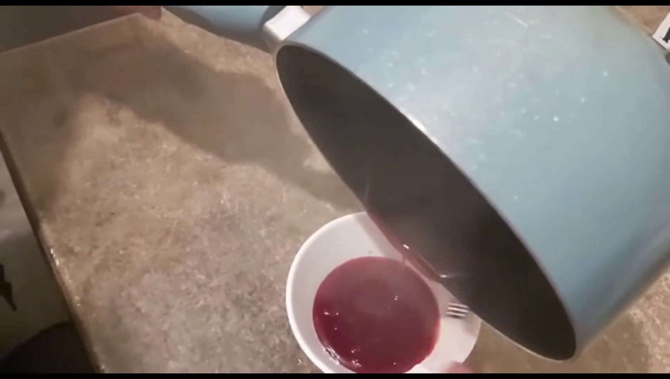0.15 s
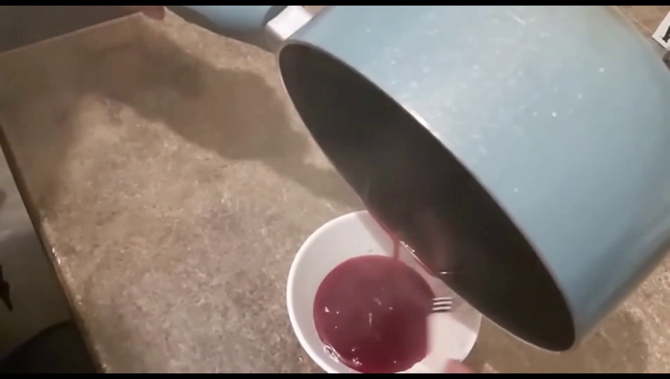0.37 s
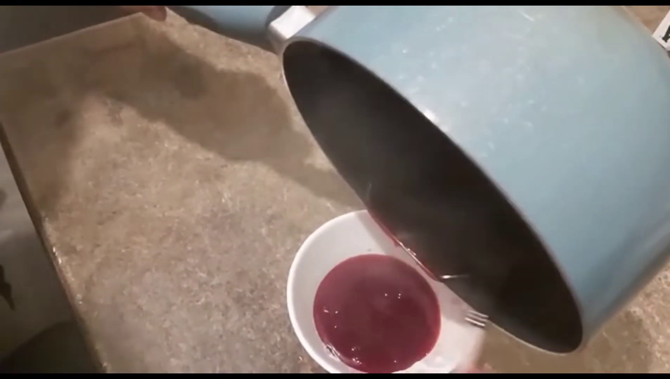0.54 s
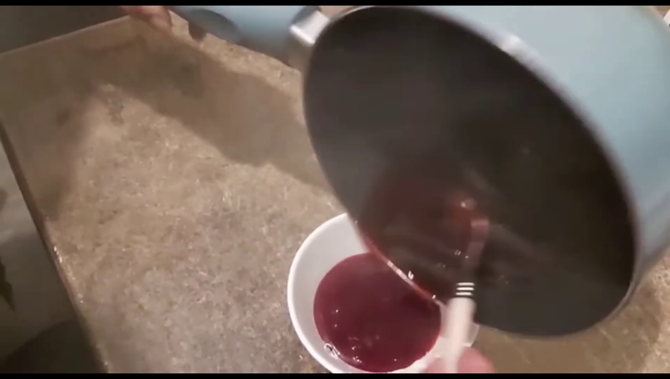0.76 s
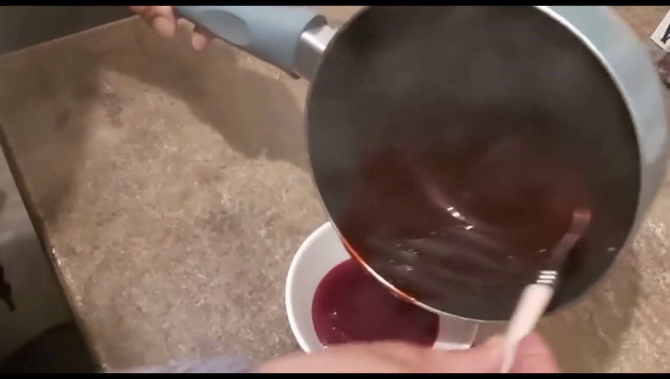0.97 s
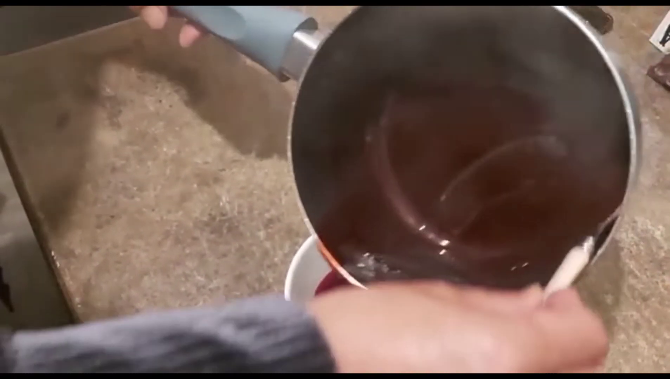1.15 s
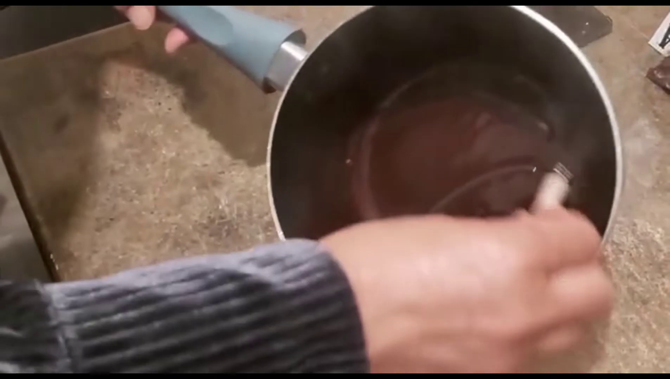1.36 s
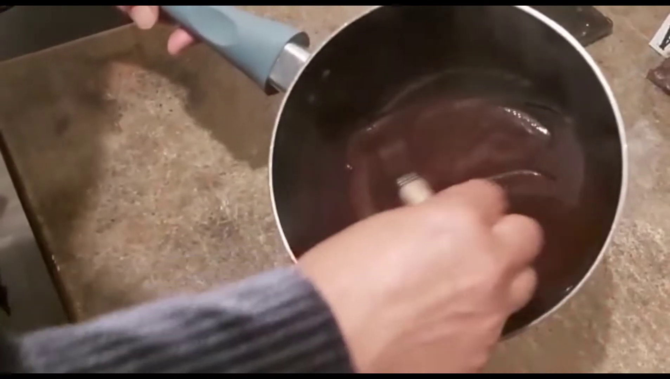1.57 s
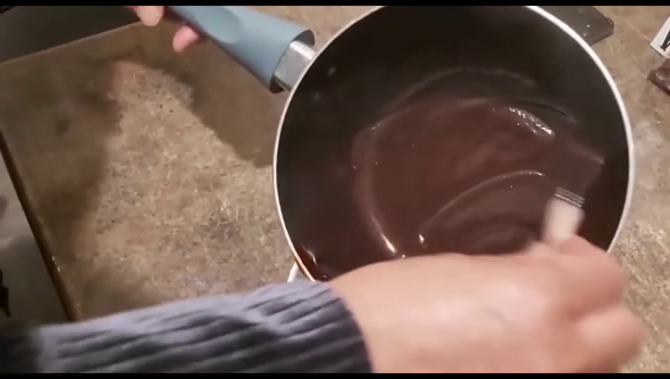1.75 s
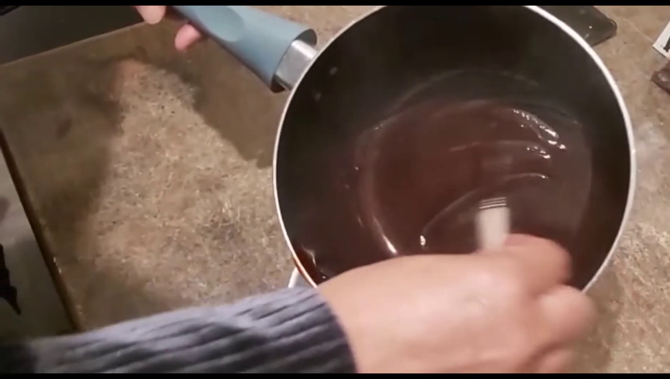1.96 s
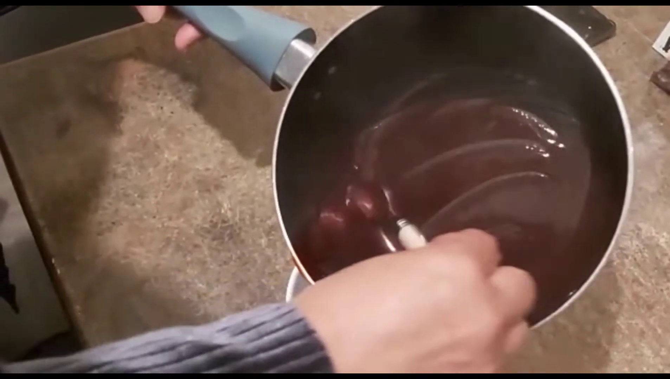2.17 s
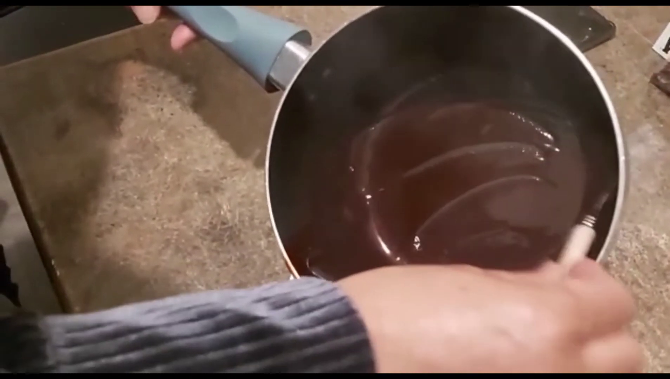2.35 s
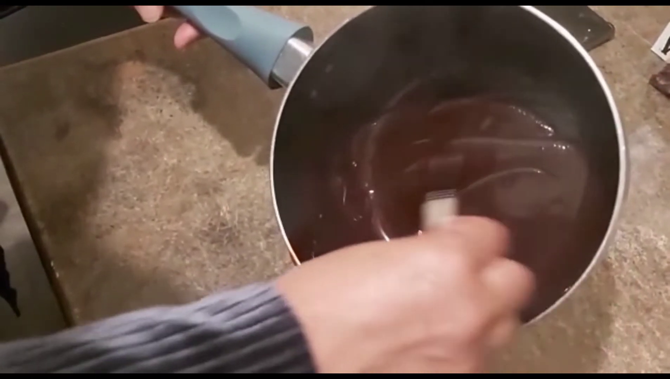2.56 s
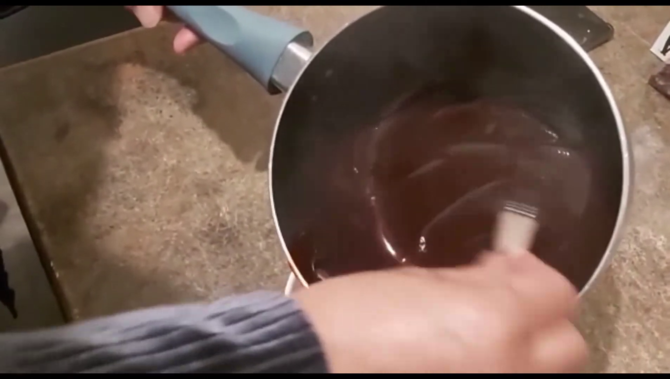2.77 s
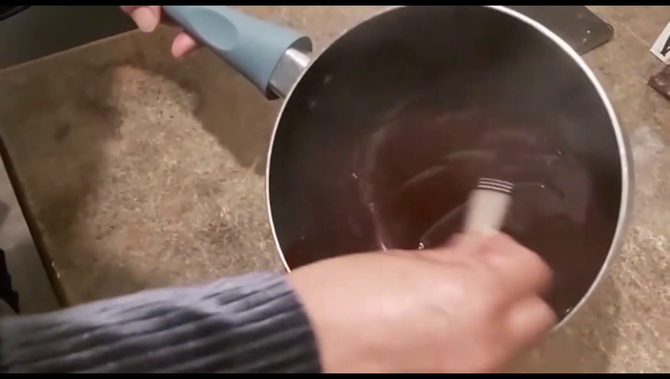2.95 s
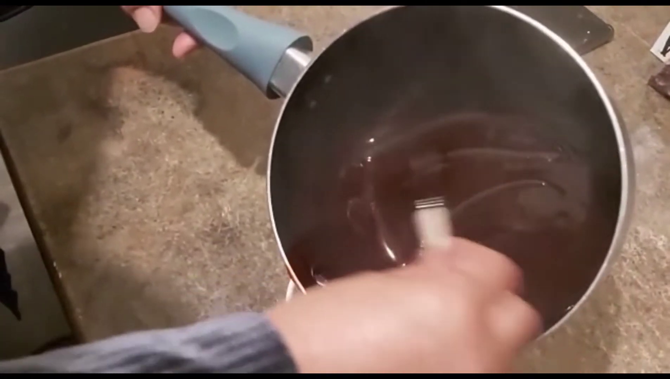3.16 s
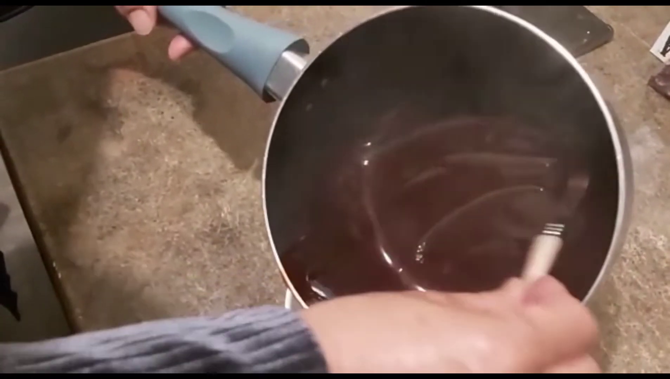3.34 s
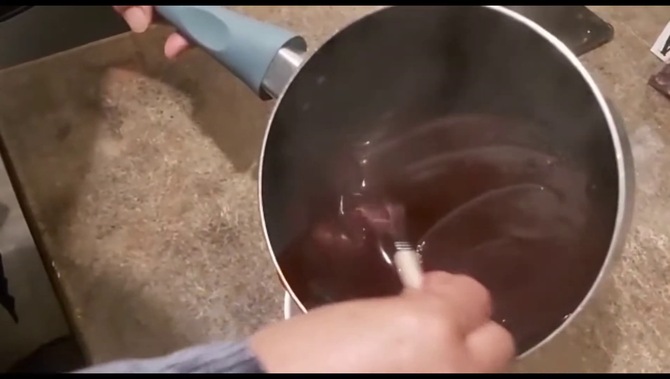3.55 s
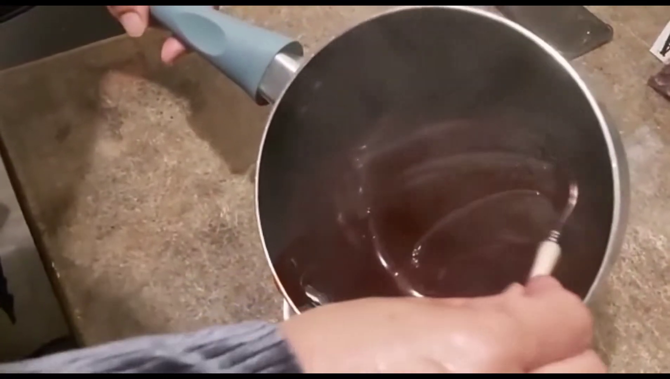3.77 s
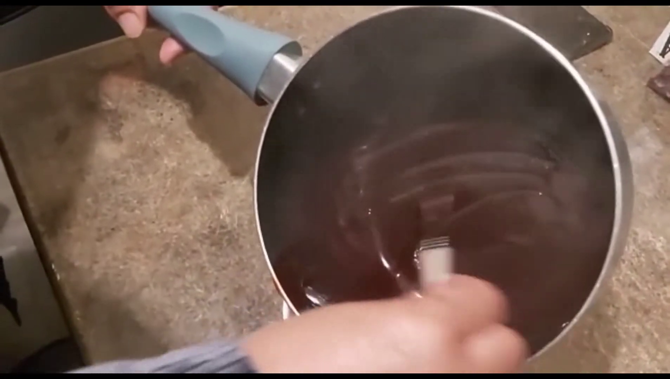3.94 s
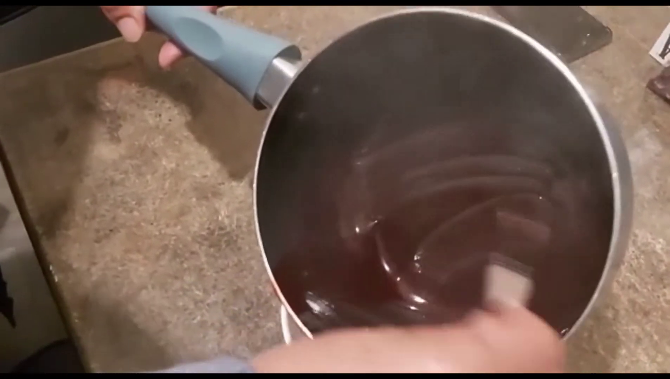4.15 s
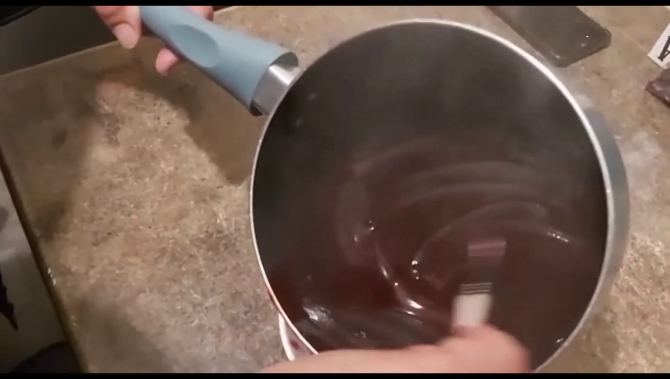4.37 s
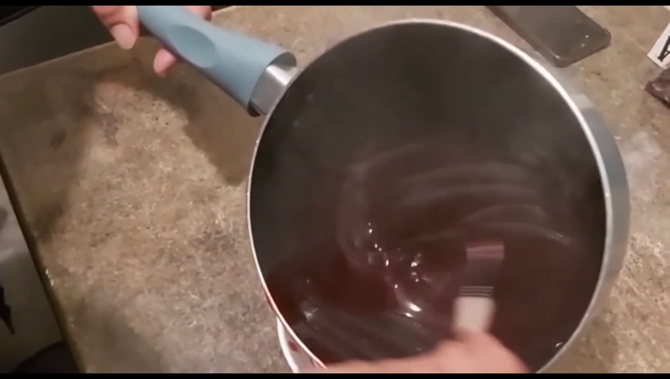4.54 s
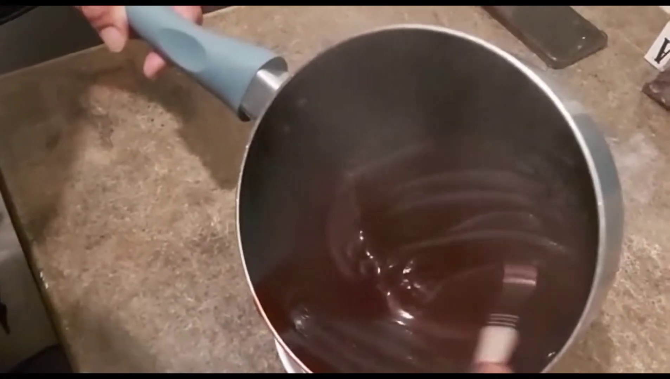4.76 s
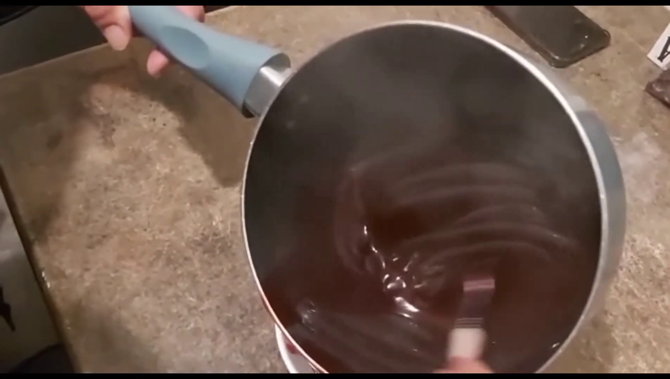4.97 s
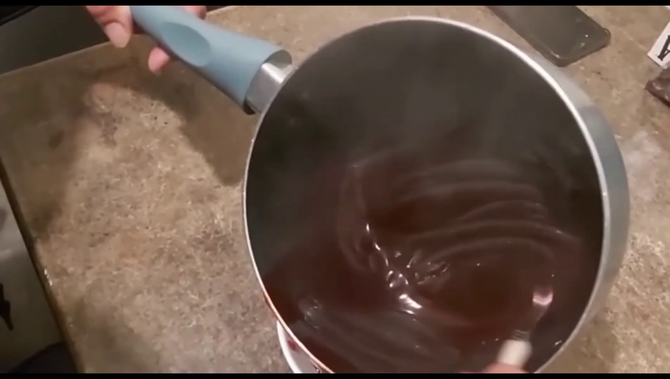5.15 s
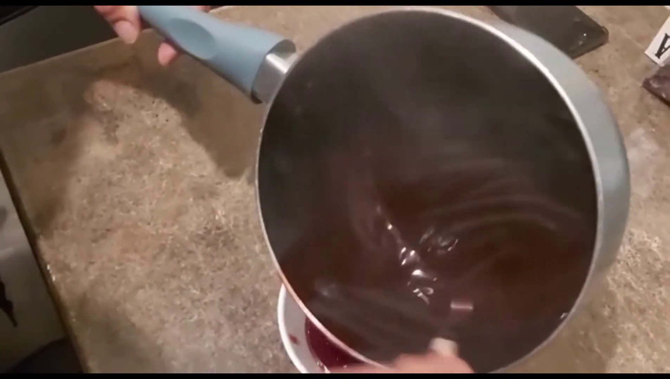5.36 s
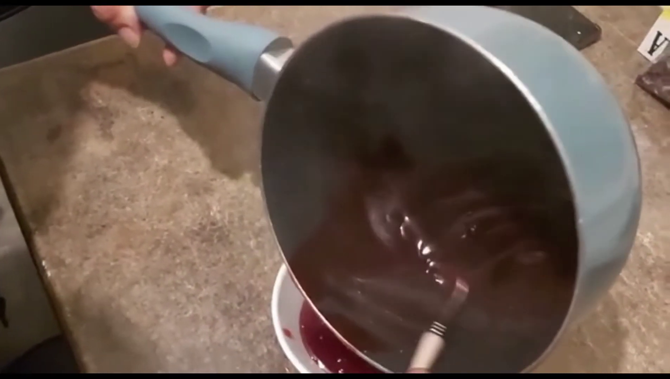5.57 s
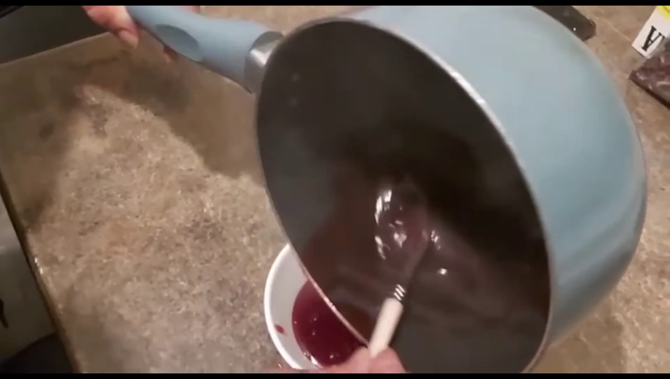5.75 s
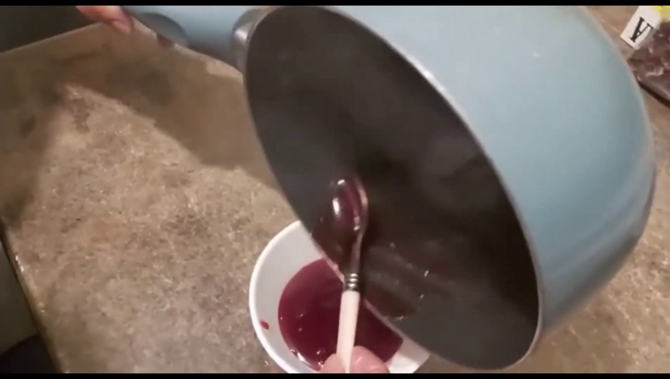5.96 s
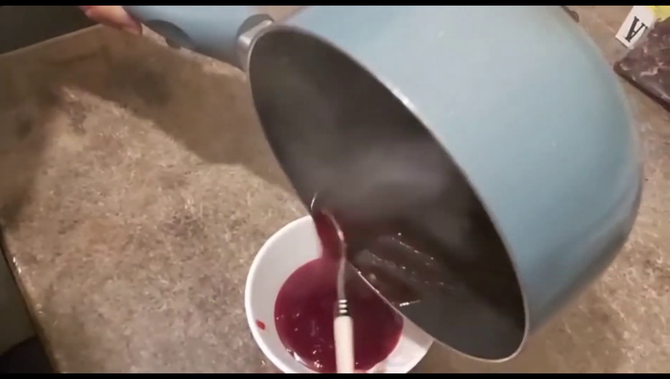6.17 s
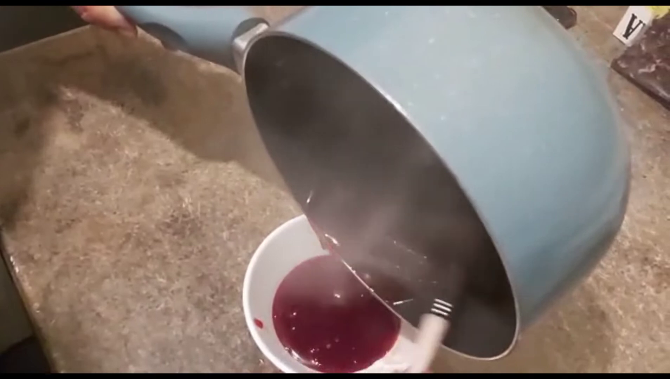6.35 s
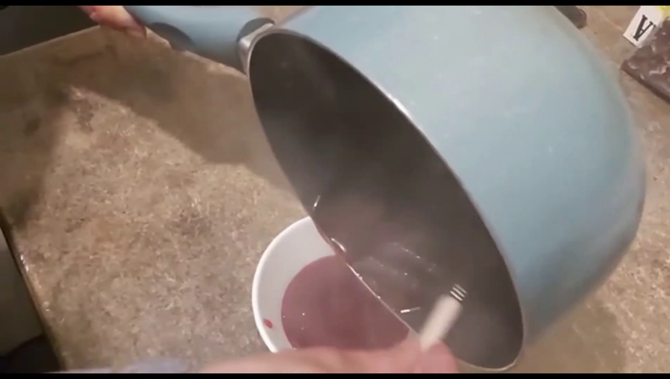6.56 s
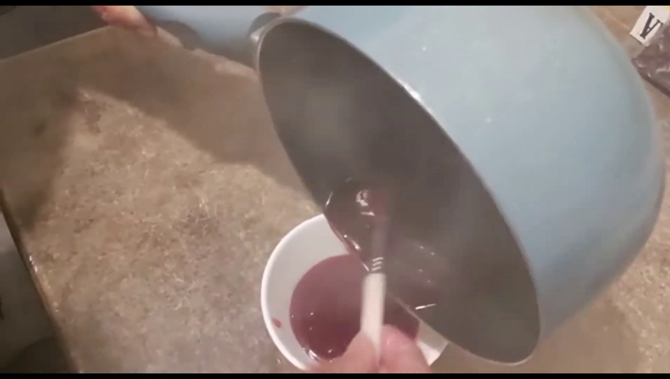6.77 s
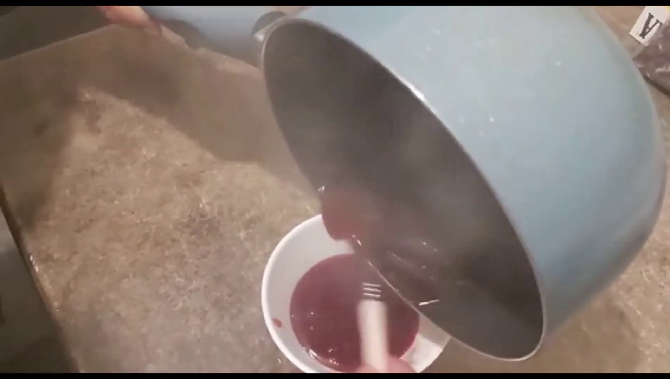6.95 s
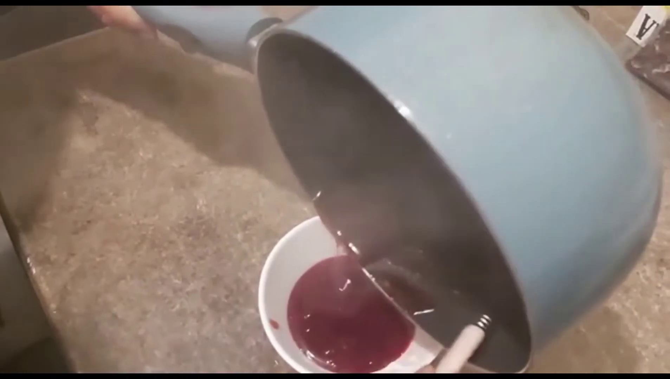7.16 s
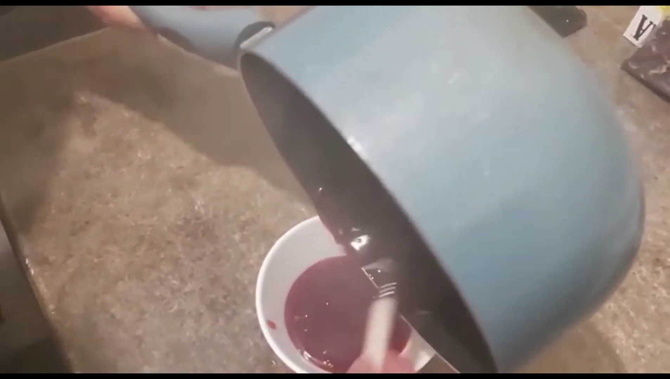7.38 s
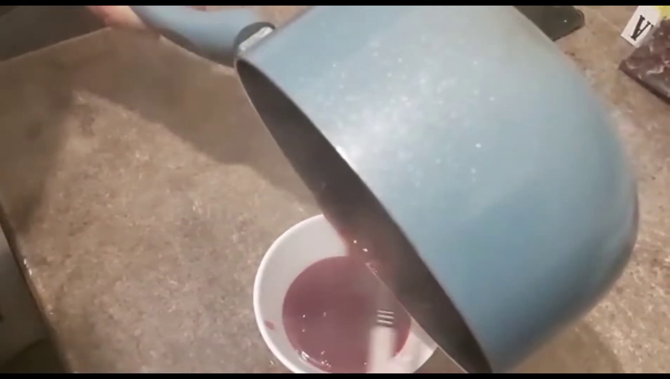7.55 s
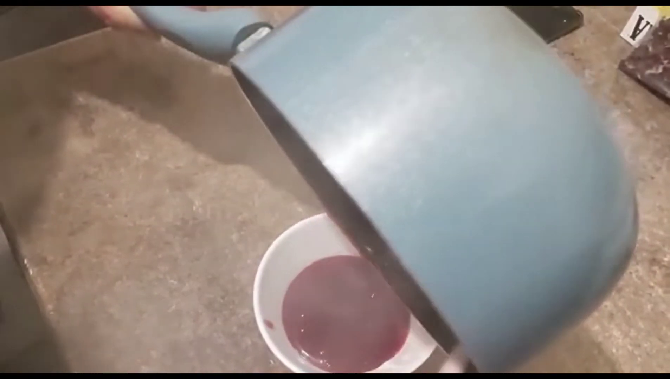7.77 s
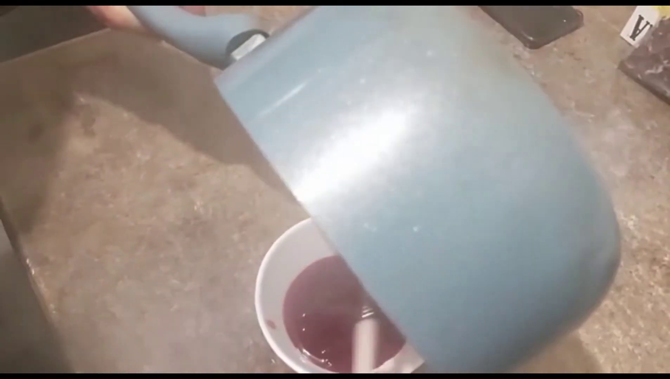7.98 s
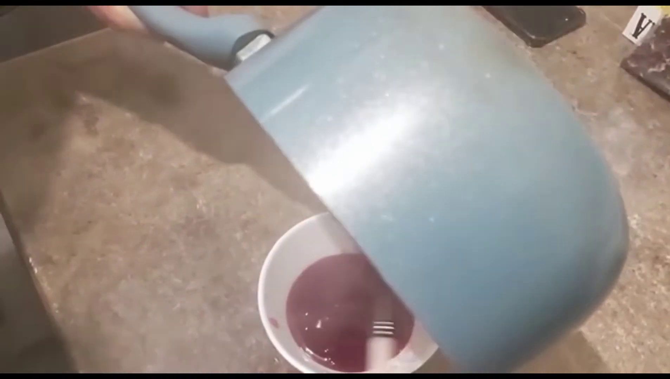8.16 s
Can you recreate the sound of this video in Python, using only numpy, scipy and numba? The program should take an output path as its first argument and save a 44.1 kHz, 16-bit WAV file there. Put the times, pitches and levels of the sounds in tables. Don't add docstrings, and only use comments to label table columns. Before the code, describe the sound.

A spoon taps and scrapes thick sauce inside a metal saucepan in gritty, lightly ringing strokes, close up over a faint kitchen hum.

```python
import sys
import numpy as np
from scipy import signal
from scipy.fft import rfft, irfft, next_fast_len
from scipy.io import wavfile
from scipy.ndimage import uniform_filter1d, map_coordinates
from numba import njit

SR = 44100
rng = np.random.default_rng(int(sys.argv[2]) if len(sys.argv) > 2 else 0)


def makeup_ratio(level_db):
    decades = np.asarray(level_db, float) / 20
    return 10 ** decades


def persist_wave(psi):
    counts = np.round(np.clip(psi, -1, 1) * 32767).astype(np.int16)
    wavfile.write(sys.argv[1], SR, np.atleast_2d(counts).T)


N = 362502
BLOCK = 64
TIME, SLOW = np.arange(N) / SR, np.arange(0, N, BLOCK) / SR

# (time [s], level [dB])
FRIDGE_HUM = [(0, -72), (.7, -66.5), (1.0, -75.5), (1.7, -68), (2.3, -73), (3.15, -62.5), (3.4, -74),
              (3.95, -72), (4.5, -64), (4.95, -78), (5.5, -70), (6.2, -72), (6.65, -63), (7.1, -74.5),
              (8.22, -65.5)]
FRIDGE_HZ = 87.2
# (frequency [Hz], density [dB per Hz])
ROOM_COLOUR = [(15, -45.5), (25, -26.5), (82, 3), (145, -3.5), (200, -2), (363, -2.5), (624, -18.5),
               (1840, -31.5), (2220, -25), (3250, -35), (5280, -30), (6740, -48.5), (7920, -35.5),
               (14800, -35.5), (16000, -36.5)]
ROOM_HISS_DB, RUMBLE_DB = -75, -68
HUM_LIFT_DB, RUMBLE_LIFT_DB, GATE_DB, GATE_S = 5.5, 6.5, -43.5, 0.073
# (time [s], frequency [Hz], peak [dB], t60 [s])
HAND_KNOCKS = [(0.532, 1305, -46, .06), (0.546, 453, -54, .12), (1.215, 840, -37.5, 0.037),
               (1.407, 800, -46, .05), (1.44, 640, -47, .08), (1.47, 655, -42.5, 0.12),
               (1.51, 720, -41, .08), (2.168, 717, -32, .06), (2.575, 688, -37, 0.09),
               (3.155, 740, -34.5, 0.07), (3.51, 756, -38, 0.077), (3.62, 702, -33, 0.073),
               (5.262, 656, -35.5, 0.097), (5.645, 920, -35.5, 0.16), (5.93, 796, -47, 0.069),
               (1.631, 398, -44, 0.033), (4.219, 320, -51.5, .08), (4.265, 430, -43, 0.14),
               (4.28, 640, -45, 0.093), (4.37, 640, -30, .08), (4.95, 632, -36.5, 0.069),
               (7.745, 454, -56, 0.2)]

# (time [s], base 0 to wall 1, lag of the right port [samples], detuning by the sauce [%])
SPOON_PLACE = [(0, 1, 2.73, 0.58), (1.4, 0.92, 2.2, 0.2), (1.47, 0.023, 1.2, -1.96),
               (3, 0.016, 1.77, -0.92), (4.13, 0.015, 2.8, -0.22), (4.17, .8, 1.4, -.2),
               (4.3, 0.68, 1.4, -0.72), (4.33, 0.018, 1.9, -0.017), (5.1, 0.027, 2.2, 0.064),
               (5.13, 1, 0.82, 0.2), (5.24, .9, 2, 0.014), (5.255, 0.031, 2, -0.25),
               (5.45, 0.056, 2.5, 0.59), (5.49, 0.66, 0.64, -0.48), (5.85, 0.65, 0.42, -0.9),
               (6.1, 0.85, 2.3, -1.02), (6.6, 0.94, 3.77, -0.87), (8.22, 1, 9.7, -0.39)]
# (start [s], hardest [s], lifted [s], hardest level [dB],
# starting level [dB])
BASE_STROKES = [(1.35, 1.43, 1.73, -47.5, -56), (1.42, 1.54, 1.607, -37, -54.5),
                (1.967, 2.07, 2.135, -34, -34), (2.151, 2.204, 2.23, -45.5, -40.5),
                (2.387, 2.41, 2.45, -45.5, -45), (2.46, 2.525, 2.613, -34, -52.5),
                (2.54, 2.6, 2.67, -36, -36), (2.924, 3.05, 3.135, -32.5, -43.5),
                (3.12, 3.145, 3.2, -33.5, -41.5), (3.445, 3.55, 3.61, -33, -33.5),
                (3.606, 3.68, 3.76, -50, -37.5), (3.921, 4.03, 4.11, -32.5, -34.5),
                (4.16, 4.23, 4.47, -38.5, -55), (4.335, 4.4, 4.6, -28.5, -43.5),
                (4.818, 4.9, 5.03, -31, -35.5), (4.95, 5.0, 5.1, -44, -44),
                (5.154, 5.18, 5.327, -42.5, -31), (5.262, 5.32, 5.46, -32, -34),
                (5.502, 5.55, 5.9, -49.5, -34.5)]
# (start [s], hardest [s], lifted [s], hardest level [dB], starting level [dB])
WALL_STROKES = [(0.107, 0.15, 0.24, -35.5, -33.5), (.16, .3, 0.42, -34.5, -36),
                (0.533, 0.48, 0.6, -57.5, -47), (0.584, 0.71, 0.81, -37.5, -35),
                (1.214, 1.26, 1.4, -49.5, -47), (5.6, 5.58, 5.76, -35, -41), (5.7, 5.78, 5.95, -44.5, -49),
                (5.8, 5.92, 6.2, -38.5, -48.5), (5.98, 6.12, 6.25, -41, -43), (6.536, 6.56, 6.7, -41, -36),
                (6.6, 6.65, 6.82, -42.5, -45.5), (6.72, 6.9, 7.053, -37.5, -45),
                (7.265, 7.37, 7.46, -47, -51.5), (7.36, 7.484, 7.63, -37, -54.5),
                (7.81, 7.835, 7.96, -40, -31), (7.87, 7.9, 8.2, -35, -49.5), (8.03, 8.08, 8.17, -36, -38)]
RISE_POWER, BASE_FALL_POWER, WALL_FALL_POWER = 1.32, 2.05, 1.74
LIFT_DB, FIRM_DB, LANDING_S = -30, -35, .03
# (time [s], peak [dB], weight of the blow [dB], edge sharpness
# [dB], left minus right [dB])
BASE_BLOWS = [(1.407, -44, -11.5, -20, 2), (1.536, -37, -37, -6.5, 1), (1.627, -59.5, -4.5, -20, 11),
              (1.963, -21.5, -36, -7.5, 7.5), (2.167, -36.5, -12, 8.5, 0), (2.389, -56, -5, 20.5, -11),
              (2.488, -40.5, -20, 0.5, 9), (2.927, -33.5, -27, 3, -5), (3.127, -39, -28, 19, 5),
              (3.444, -19.5, -47, -6.5, 8.5), (3.618, -23.5, -16, -0.5, -13.5), (3.923, -20, -45.5, 0, -12),
              (4.333, -30, -8, 3.5, -16), (4.55, -42, -1, -15, -10), (4.589, -47, -14, 0, -7),
              (4.817, -27.5, -17.5, 1, -7), (5.145, -30.5, -20.5, 5, -8.5), (5.26, -18.5, -14.5, 8.5, -6),
              (5.496, -32, -18.5, -13, -8)]
# (time [s], peak [dB], weight of the blow [dB], edge sharpness [dB], left minus right [dB])
WALL_BLOWS = [(0.003, -53.5, -30.5, -27, 2.5), (0.093, -62, -24, 3, -5), (0.111, -24.5, -14, 10.5, -9.5),
              (0.3, -28, -36, -12.5, 10.5), (0.535, -61.5, -5.5, -20, 11), (0.587, -24.5, -11, 9, -5),
              (1.216, -47.5, -15, -17.5, 6), (1.256, -38.5, -23.5, -5.5, 8), (5.608, -27.5, -3.5, 4, 3.5),
              (6.535, -40.5, -1.5, 25, -2.5), (7.265, -42, -16.5, 13, -9), (7.731, -64, 1, 13, 10),
              (7.81, -29.5, -12.5, 12, 9)]
TAP_RING_DB, TAP_HISS_DB, TAP_RING_SHARE = 5, -4.5, 0.46
BASE_CLICK_DB, WALL_CLICK_DB = 17.0, 14.0

# thud, body, ring, hiss [Hz]
BAND_HZ = [230, 650, 2400, 6500, 15400]
BASE_FIRM_DB = [-28, -3.5, 0.5, -16]
WALL_FIRM_DB = [-23, -1, -1.5, -12.5]
LIGHTNESS = [0.74, -0.15, -0.12, -0.17]
SHARPNESS = [0.47, -0.41, 0.89, 0.51]
# (time [s], hollow under it [Hz], edge sharpness [dB], pitch its bowl favours [Hz])
SPOON_HOLD = [(.12, 1307, 3, 2870), (.24, 1252, 0, 2690), (.31, 1900, -3, 3310), (.4, 2000, -2, 2650),
              (.54, 1293, -12.5, 2640), (.6, 1500, 1, 2990), (.72, 1500, 5, 3280), (.8, 2100, 1.5, 2700),
              (1.22, 837, -13, 2940), (1.26, 1600, -3.5, 4010), (1.38, 1500, -7, 4300),
              (1.459, 692, 6, 4700), (1.55, 1100, 7.5, 4600), (1.97, 1002, -9, 3180),
              (2.1, 1480, -0.5, 3010), (2.17, 920, -4, 4700), (2.5, 1500, -1.5, 3280),
              (2.62, 1200, -2, 2985), (2.94, 1387, 3, 2920), (3.05, 1100, 0.5, 3200),
              (3.15, 850, 0.5, 4898), (3.45, 950, -2.5, 4080), (3.55, 1400, 2, 3840),
              (3.62, 868, 0.5, 5150), (3.93, 955, 1.5, 3370), (4.07, 1494, 2, 3296),
              (4.25, 2070, 3.5, 4022), (4.36, 720, -2, 4400), (4.42, 1500, -1.5, 4300),
              (4.55, 1544, -1, 4200), (4.83, 1506, -1.5, 3790), (4.93, 1700, 1, 4330),
              (5.15, 1600, -1.5, 3600), (5.27, 1114, -0.5, 3120), (5.35, 1793, 0, 3190),
              (5.5, 1840, -7.5, 2760), (5.65, 970, -3, 4300), (5.83, 1460, -8, 2978),
              (5.97, 1360, -2, 4300), (6.12, 1650, -6, 4200), (6.55, 1100, 3.5, 4500),
              (6.78, 1000, 1, 4200), (6.87, 1750, -2, 3539), (6.95, 2300, -3, 3400), (7.28, 1580, 1, 3500),
              (7.46, 970, 1, 3470), (7.55, 1820, -3.5, 3440), (7.83, 2100, 2, 3490), (8.0, 1120, 2, 3540),
              (8.12, 1550, -1, 3200)]
HOLLOW_GLIDE_OCT = 0.14
# (time [s], level [dB])
HOLLOW_WHISTLE = [(.15, 0), (.28, 6), (.65, 3), (1.25, 2.5), (1.38, 7), (1.47, 9), (1.56, -2), (2.05, -4),
                  (2.57, -1.5), (3.05, -7), (3.16, 2), (3.53, -4.5), (4.0, -5), (4.25, 1), (4.37, 4),
                  (4.47, -6), (4.9, -2.5), (5.32, -5), (5.66, 0.5), (5.83, 8), (5.97, 10), (6.12, 4),
                  (6.6, 1), (6.8, 5), (6.93, 5), (7.3, -5), (7.48, 4), (7.86, -4.5), (8.05, 2)]
# (time [s], thud level [dB])
SAUCE_HEAP = [(.15, 8), (.3, -3.5), (.62, 15.5), (.78, -12.5), (1.3, -0.5), (1.9, -6.5), (2.08, -7),
              (2.2, 10.5), (2.55, -12), (3.08, -7), (3.5, -4), (3.68, 4), (4.0, -1.5), (4.27, 12), (4.9, 0),
              (5.6, 8.5), (5.9, 0.5), (8.0, -7)]
# (time [s], ringing level [dB])
EDGE_CONTACT = [(.15, 0.5), (.3, -0.5), (.62, 1.5), (.74, 1), (1.24, -3.5), (1.38, 0.5), (1.54, 1.5),
                (2.0, -0.5), (2.1, -4.5), (2.18, 2.5), (2.41, 0.5), (2.56, 0), (2.97, 2), (3.06, 1),
                (3.15, -1.5), (3.47, -2.5), (3.56, -2), (3.64, -3.5), (3.95, -1.5), (4.05, -1.5),
                (4.25, -6), (4.43, 4.5), (4.55, 2), (4.85, 1.5), (4.93, -1), (5.18, -2), (5.3, 2),
                (5.52, -2.5), (5.65, 1), (5.85, -2), (6.05, 2.5), (6.58, -5), (6.78, -2), (6.92, 2),
                (7.3, 4), (7.5, 1.5), (7.85, -2), (8.05, 1.5)]

# (frequency [Hz], width under the spoon [Hz], level [dB])
BASE_MODES = [(931, 46, -2), (1450, 38, -19), (1890, 44, 0), (2940, 38, -2), (3520, 55, -6), (4360, 90, -8),
              (4880, 63, -6), (5940, 80, -9), (6280, 36, -11), (7170, 160, -22), (7670, 140, -18),
              (8950, 53, -25), (9180, 95, -26), (9840, 58, -28), (11700, 210, -31)]
# (frequency [Hz], width under the spoon [Hz], level [dB])
WALL_MODES = [(926, 34, -6), (1500, 55, -4), (1860, 26, -6), (2160, 36, 0), (2610, 32, -3), (3100, 38, -4),
              (3500, 36, -3), (3960, 60, -10), (4450, 140, -13), (5120, 100, -11), (5510, 120, -10),
              (6000, 88, -16), (6700, 28, -14), (6970, 120, -13), (7130, 53, -15), (8380, 82, -19),
              (9260, 47, -18), (9940, 66, -19), (10400, 53, -20), (11500, 88, -21)]
BASE_DETUNING = [1.1, 1.1, 1.9, .35, 0.11, .8, 0.46, 1.5, .9]
WALL_EMPTY_GAIN = [5, -2, 5, 2.3, -6, -4.5, -2, -7.5, -0.5, -4]
EMPTY_S = 3.0
# (time [s], level [dB])
NODE_CROSSING = [(1.54, 3), (2.05, -3), (2.2, -1), (2.57, 4), (3.03, 5), (3.14, -5), (3.5, -2), (3.62, -5),
                 (4.0, -3), (4.45, -6), (4.9, 1), (5.3, -2)]
CROSSING_SHARE = [0.01, 0.01, 0.01, 0.01, 0.1, 1.01, -1.01, 0.3]
# (frequency [Hz], width [Hz], level [dB])
HOOP_MODES = [(949, 16, -13), (1803, 9.2, -11)]
# (frequency [Hz], width [Hz], from the base [dB], from the wall [dB])
SHELL_MODES = [(247, 20, -16, -1), (384, 150, -8.5, 2.5), (657, 170, 12, -8)]
# (frequency [Hz], density [dB per Hz])
RASP_COLOUR = [(120, -57), (200, -20.5), (720, -19.5), (933, -0.5), (1100, -15.5), (1840, -5.5),
               (2420, -12), (3560, -7), (12200, -34), (14600, -42), (16000, -65.5)]
TREBLE_HZ = [6500, 8200, 10000, 11700, 13300, 15300]
# (frequency [Hz], left gains and right loses [dB])
MIC_TILT = [(300, -1), (800, -0.5), (2500, -0.1), (5000, -2.5), (9000, 2), (15000, 0.5)]


def track(table, times):
    return np.interp(times, *np.transpose(table)[:2])


def per_sample(control):
    return np.interp(TIME, SLOW, control)


def butter(x, order, hz, kind="low"):
    return signal.sosfilt(signal.butter(order, hz, kind, fs=SR, output="sos"), x)


def below(x, order, hz):
    return signal.sosfiltfilt(signal.butter(order, hz, fs=SR, output="sos"), x)


def band(x, lo_hz, hi_hz):
    return butter(x, 4, [lo_hz, hi_hz], "band") * np.sqrt(SR / 2 / (hi_hz - lo_hz))


def colour(x, spectrum):
    size = 2 * next_fast_len(N // 2 + 4096)
    hz, db = np.transpose(spectrum)
    f = np.arange(size // 2 + 1) * SR / size + 1
    cepstrum = irfft(np.log(makeup_ratio(np.interp(np.log(f), np.log(hz), db))), size)
    cepstrum[1:size // 2] *= 2
    cepstrum[size // 2 + 1:] = 0
    return irfft(rfft(x, size) * np.exp(rfft(cepstrum)), size)[..., :N]


def walk(rate):
    hold = max(int(SR / BLOCK / rate), 1)
    steps = np.repeat(rng.standard_normal(len(SLOW) // hold + 1), hold)
    return 1.87 * uniform_filter1d(uniform_filter1d(steps, hold), hold)[:len(SLOW)]


def tail(t60, likeness, size):
    common, own = rng.standard_normal(size), rng.standard_normal((2, size))
    likeness = np.clip(likeness, 0, 1)
    noise = np.sqrt(likeness) * common + np.sqrt(1 - likeness) * own
    h = noise * makeup_ratio(-60 * TIME[:size] / t60)
    return h / np.sqrt(np.mean(np.sum(h ** 2, axis=1)))


def kitchen():
    gate_blocks = GATE_S * SR / BLOCK
    busy = uniform_filter1d(makeup_ratio(pushes()[0]), int(gate_blocks))
    busy = uniform_filter1d(busy, int(gate_blocks / 2))
    gate = per_sample(np.tanh(busy / makeup_ratio(GATE_DB)))
    hz = FRIDGE_HZ + 1.5 * per_sample(walk(5))
    hum = np.sqrt(2) * np.sin(2 * np.pi * np.cumsum(hz) / SR)
    hum *= makeup_ratio(track(FRIDGE_HUM, TIME) + HUM_LIFT_DB * gate)
    noise = rng.standard_normal((3, N))
    air = colour(1.3 * noise[0] + 0.84 * noise[1:], ROOM_COLOUR)
    rumble = below(air, 2, 450)
    hiss = air - rumble
    rumble *= makeup_ratio(RUMBLE_DB + RUMBLE_LIFT_DB * gate - 4.0) / rumble.std()
    lean = makeup_ratio(np.array([[-2.2], [2.2]]))
    return lean * (hum + rumble) + hiss * makeup_ratio(ROOM_HISS_DB) / hiss.std()


def knocks():
    out, t = np.zeros(N + SR), TIME[:SR // 2]
    for s, hz, db, t60 in HAND_KNOCKS:
        i = int(s * SR)
        swell = 1 - np.exp(-t / 0.0017)
        out[i:i + len(t)] += makeup_ratio(db - 60 * t / t60) * swell * np.sin(2 * np.pi * hz * t)
    return out[:N]


def pushes():
    level, course = np.full(len(SLOW), -120.), np.zeros(len(SLOW))
    taps_s = np.transpose(BASE_BLOWS + WALL_BLOWS)[0]
    for rows, fall in ((BASE_STROKES, BASE_FALL_POWER), (WALL_STROKES, WALL_FALL_POWER)):
        for start, hardest, lifted, db, entry_db in rows:
            tap = taps_s[np.argmin(abs(taps_s - start))]
            if abs(tap - start) < LANDING_S:
                start = tap + .003
            hardest = max(hardest, start + .002)
            u = (SLOW - hardest) / np.where(SLOW < hardest, hardest - start, lifted - hardest)
            swell = (entry_db - db) * abs(u) ** RISE_POWER
            ease = LIFT_DB * abs(u) ** fall
            push = db + np.where(u < 0, swell, ease)
            rules = (u >= -1) & (push > level)
            level, course = np.where(rules, push, level), np.where(rules, u, course)
    return level, np.clip(course, -1, 1)


def drag():
    pressure, course = pushes()
    s, hollow_hz, edge, bowl_hz = np.transpose(SPOON_HOLD)
    wall = np.clip(track(SPOON_PLACE, SLOW), 0, 1)
    light = np.clip(FIRM_DB - pressure, -10, 30)
    edge = np.interp(SLOW, s, edge)
    level = []
    for base, side, gain, reach in zip(BASE_FIRM_DB, WALL_FIRM_DB, LIGHTNESS, SHARPNESS):
        firm = base + wall * (side - base)
        level.append(per_sample(makeup_ratio(pressure + firm + gain * light + reach * edge)))
    level = np.array(level)
    level[0] *= makeup_ratio(track(SAUCE_HEAP, TIME))
    grit = rng.standard_normal(N) * makeup_ratio(2.1 * rng.exponential(size=N))
    shared = 0.4 * walk(50) + 0.9 * walk(300)
    patches = [per_sample(makeup_ratio(shared + 1.5 * walk(300) + 0.6 * walk(18))) for _ in level]
    force = grit * np.array(patches)
    friction = uniform_filter1d(level, 200) * force / force.std()
    glide = 2 ** (HOLLOW_GLIDE_OCT * uniform_filter1d(course, size=16))
    return friction, np.interp(SLOW, s, hollow_hz) * glide, np.interp(SLOW, s, bowl_hz)


def taps(contact_s=.0009, chatter_s=.004):
    out, t = np.zeros((4, 2, N + 1000)), TIME[:1000]
    shape = (np.exp(-t / contact_s) + 0.028 * np.exp(-t / chatter_s)) * (1 - np.exp(-t / 0.0009))
    for s, db, thud, edge, pan_db in BASE_BLOWS + WALL_BLOWS:
        click_db = WALL_CLICK_DB if track(SPOON_PLACE, s) > .5 else BASE_CLICK_DB
        ring, hiss = TAP_RING_DB + TAP_RING_SHARE * edge, TAP_HISS_DB + edge
        jolt = shape * np.tanh(2.0 * rng.standard_normal(len(t)))
        jolt *= makeup_ratio(-4.0) / np.sqrt(np.mean(jolt[:100] ** 2))
        jolt[20] += makeup_ratio(click_db)
        bands_db = db + np.array([thud, 0, ring, hiss])
        ports_db = np.clip([pan_db, -pan_db], -10, 10) / 2
        i = int(s * SR)
        out[:, :, i:i + len(t)] += makeup_ratio(bands_db[:, None] + ports_db)[..., None] * jolt
    return out[..., :N]


@njit
def add(out, force, grip, pole, turn, block):
    z = 0j
    for j in range(len(pole)):
        back = 1 / turn[j]
        for i in range(j * block, min((j + 1) * block, len(force))):
            z = z * pole[j] + grip[j] * force[i] + 1e-18
            out[0, i] += (turn[j] * z).imag
            out[1, i] += (back * z).imag


def add_mode(out, force, hz, width_hz, grip):
    pole = np.exp((2j * np.pi * hz - np.pi * width_hz) / SR)
    turn = makeup_ratio(1.5 * walk(4)) * np.exp(.8j * np.tanh(hz / 1300) * walk(16))
    add(out, force, grip * np.sqrt(2 - 2 * abs(pole) ** 2), pole, turn, BLOCK)


def pan_modes(modes, force, hollow_hz, bowl_hz, detune, free_db, focus_db, sag, lobes, place):
    out = np.zeros((2, N))
    sweep_db = 1.3
    group = np.searchsorted(BAND_HZ, [m[0] for m in modes]) - 1
    power = np.array([makeup_ratio(2 * db) * width for _, width, db in modes])
    sag, lobes = (np.append(v, np.zeros(len(modes)))[:len(modes)] for v in (sag, lobes))
    for (hz, width, _), k, p, feel, lobe in zip(modes, group, power, sag, lobes):
        share = np.sqrt(p / power[group == k].sum()) * makeup_ratio(lobe * place)
        if k == 1:
            share = share * makeup_ratio(6.5 - focus_db * abs(np.log2(hz / hollow_hz)))
        if k == 2:
            share = share * makeup_ratio(3.0 - 8.9 * abs(np.log2(hz / bowl_hz)))
        loaded_hz = hz * (1 + feel * detune + 0.002 * walk(9.8))
        add_mode(out, force[k], loaded_hz, .5 * width, share * makeup_ratio(sweep_db * walk(14)))
        free_hz, free_width_hz = hz * (1 + 0.74 * feel * detune), 8 + hz / 280
        add_mode(out, force[k], free_hz, free_width_hz, share * makeup_ratio(free_db + sweep_db * walk(8.7)))
    return out


def spread(force, t60, likeness, count=3):
    weights = np.array([makeup_ratio(3.4 * walk(9)) for _ in range(count)])
    weights /= np.sqrt(np.sum(weights ** 2, axis=0))
    out = 0
    for weight in weights:
        response = tail(t60, likeness, size=3000)
        out = out + signal.oaconvolve(per_sample(weight) * force, response, axes=1)[:, :N]
    return out


def mottled(sound, patchy_db):
    lower = below(sound, 4, TREBLE_HZ[0])
    out = lower
    for hz in TREBLE_HZ[1:]:
        upto = below(sound, 4, hz)
        out = out + (upto - lower) * per_sample(makeup_ratio(patchy_db * walk(40)))
        lower = upto
    return out


def flattened(spectrum):
    hz, db = np.transpose(spectrum)
    group = np.clip(np.searchsorted(BAND_HZ, hz), 1, 4)
    return [(f, d - 20 * np.log10(np.mean(makeup_ratio(db[group == g])))) for f, d, g in zip(hz, db, group)]


def ringing(friction, blows, hollow_hz, bowl_hz, wall, detune):
    slow_wall = wall[::BLOCK]
    bite = np.clip(uniform_filter1d(abs(friction[1]), 1000) / makeup_ratio(-38), 0, 1) ** .3
    bite = bite * makeup_ratio(-0.6 * np.clip(track(SAUCE_HEAP, TIME), 0, 20))
    bite = bite * makeup_ratio(track(EDGE_CONTACT, TIME))
    force = bite * friction + makeup_ratio(-4.5) * blows.mean(axis=1)
    rings = pan_modes(BASE_MODES, force * np.sqrt(1 - wall), hollow_hz, bowl_hz, detune,
                      free_db=-9.5, focus_db=8.0, sag=BASE_DETUNING,
                      lobes=CROSSING_SHARE, place=track(NODE_CROSSING, SLOW))
    rings += makeup_ratio(-3.5) * pan_modes(WALL_MODES, force * np.sqrt(wall), hollow_hz, bowl_hz, detune,
                                   free_db=-6.5, focus_db=10.0, sag=np.ones(len(WALL_MODES)),
                                   lobes=WALL_EMPTY_GAIN, place=SLOW > EMPTY_S)
    for side in (.9, 1.12):
        whistle_db = -17.5 + 3.5 * slow_wall + track(HOLLOW_WHISTLE, SLOW) + 1.8 * walk(20)
        add_mode(rings, friction[1], side * hollow_hz, 240., makeup_ratio(whistle_db))
    for hz, width_hz, db in HOOP_MODES:
        nearness = (1 - .95 * slow_wall) ** 1.2
        add_mode(rings, force[1], hz * (1 + detune / 2), width_hz, makeup_ratio(db) * nearness)
    rings = butter(rings, 4, [620, 11000], "band")
    heave = band(blows[0].mean(axis=0) + makeup_ratio(-6.0) * friction[0], 200, 1000) * makeup_ratio(-17.5)
    for hz, width_hz, base_db, wall_db in SHELL_MODES:
        grip = makeup_ratio(base_db + (wall_db - base_db) * slow_wall)
        add_mode(rings, heave, hz + 0 * SLOW, width_hz, grip)
    return rings


def rasping(friction, blows, wall):
    edges = list(zip(BAND_HZ, BAND_HZ[1:]))
    reach = makeup_ratio(np.array([0.5, 3.5, -2.5, 2.5]))[:, None]
    flat_db = np.array([-0.8, -2.0, -2.0, -2.0])[:, None]
    reach = reach * makeup_ratio(flat_db * (1 - wall))
    rasp = sum(g * band(f, *e) for g, f, e in zip(reach, friction, edges))
    crack = sum(band(f, *e) for f, e in zip(blows, edges))
    dense = mottled(makeup_ratio(-4.5) * spread(rasp[None], t60=0.033, likeness=0.028), patchy_db=4.0)
    dense = dense + makeup_ratio(-13.5) * spread(crack, t60=0.076, likeness=0.77)
    return colour(dense + makeup_ratio(-9.0) * crack, flattened(RASP_COLOUR))


def saucepan():
    friction, hollow_hz, bowl_hz = drag()
    blows = taps()
    s, wall, lag, detune = np.transpose(SPOON_PLACE)
    wall = np.clip(np.interp(TIME, s, wall), 0, 1)
    detune = np.interp(SLOW, s, detune) / 100
    out = ringing(friction, blows, hollow_hz, bowl_hz, wall, detune) + rasping(friction, blows, wall)
    out[1] = map_coordinates(out[1], [np.arange(N) - np.interp(TIME, s, lag)], order=3)
    return out


def scene():
    pan = saucepan() + knocks()
    dull = butter(pan.mean(axis=0), 1, 5000)
    echo = signal.oaconvolve(dull[None], tail(t60=0.35, likeness=0.049, size=20000), axes=1)[:, :N]
    return kitchen() + makeup_ratio(-9.0) * echo + pan


def top_cut(x):
    return signal.sosfilt(signal.butter(12, 16050, fs=SR, output="sos"), x)


def record(dry):
    soft = butter(np.tanh(dry), 1, 11500)
    left = colour(soft[0], MIC_TILT)
    right = colour(soft[1], [(hz, -db) for hz, db in MIC_TILT])
    mix = np.array([left, right]) * makeup_ratio(np.array([[-.1], [.1]]))
    return top_cut(mix)


dry = scene()
out = record(dry)
persist_wave(out)
```